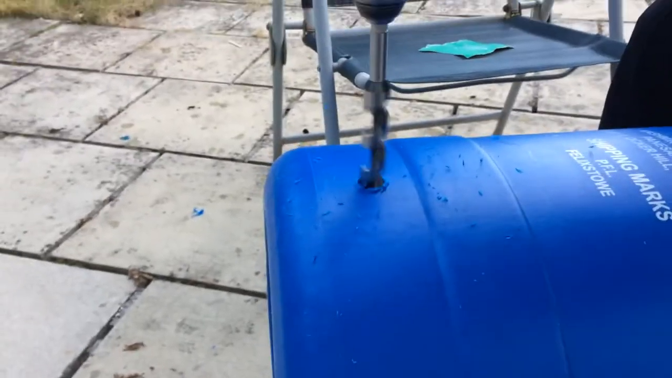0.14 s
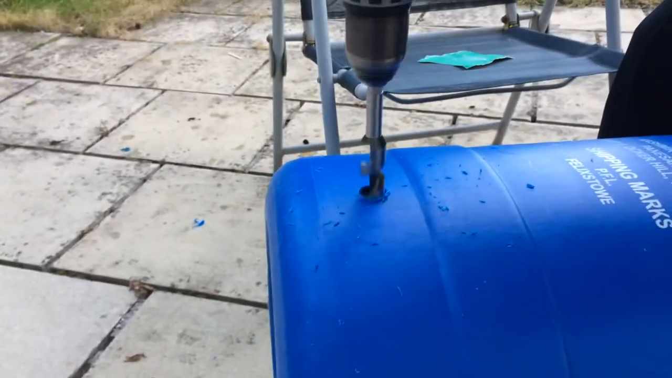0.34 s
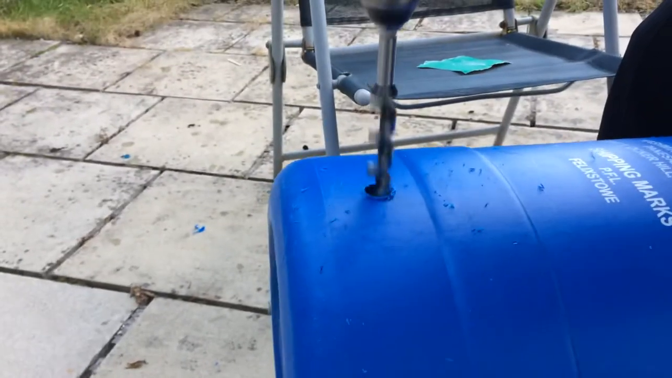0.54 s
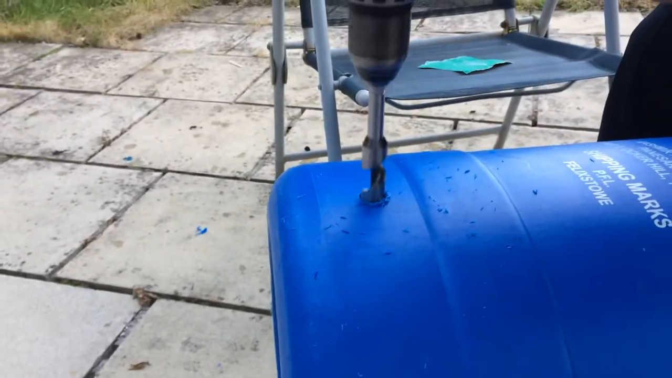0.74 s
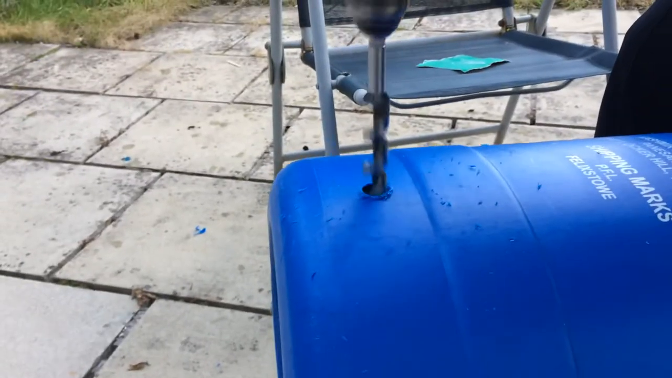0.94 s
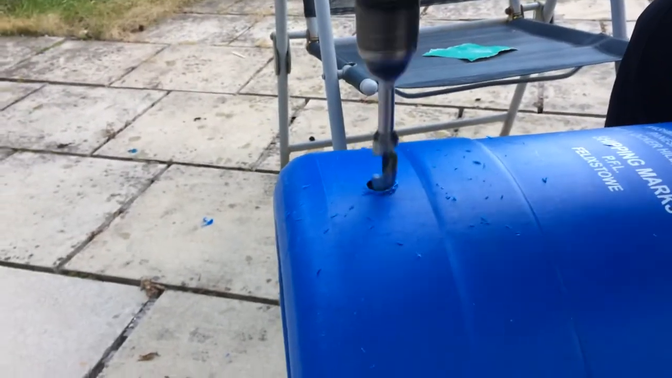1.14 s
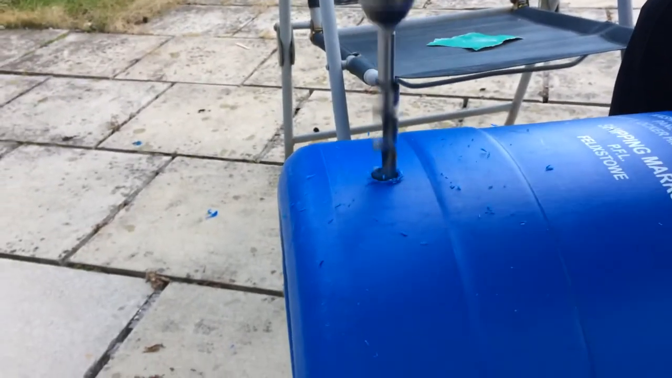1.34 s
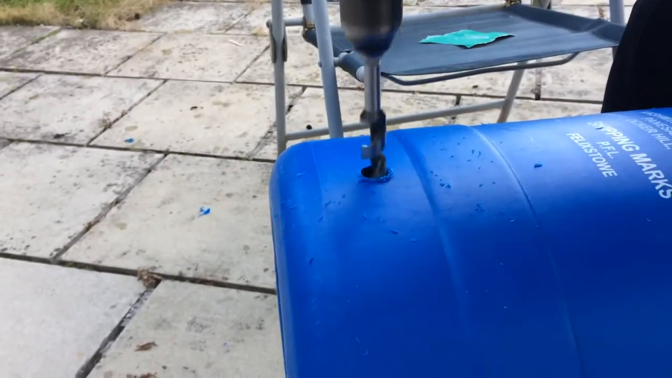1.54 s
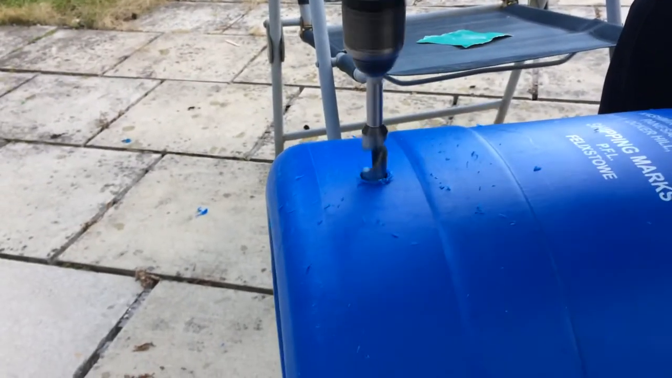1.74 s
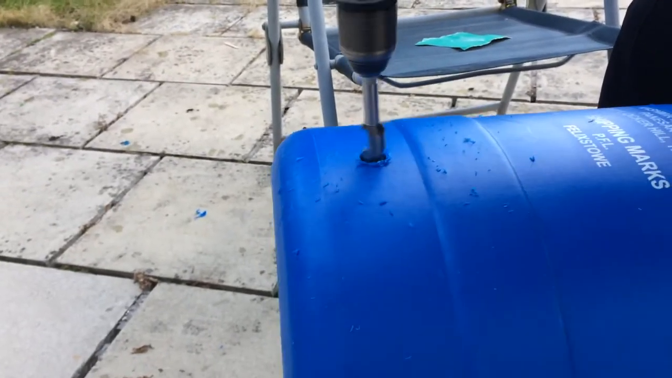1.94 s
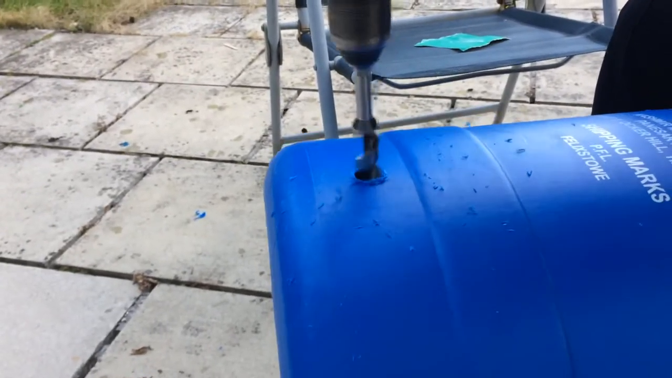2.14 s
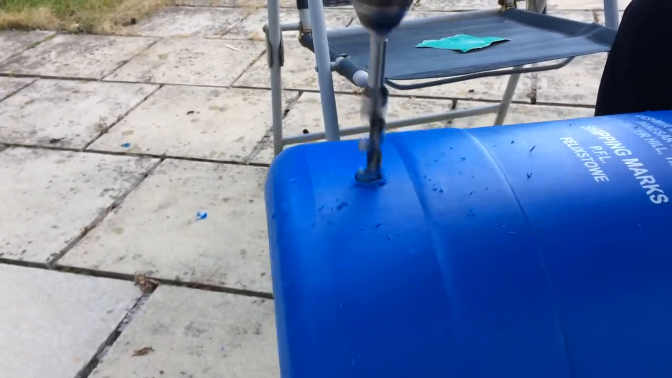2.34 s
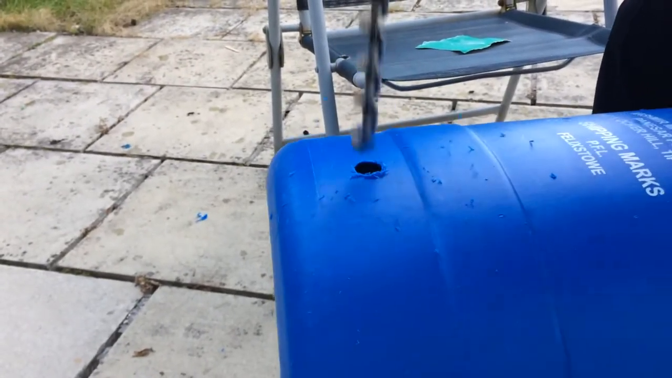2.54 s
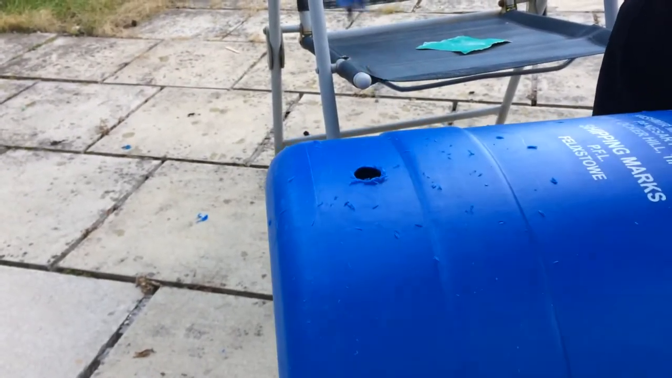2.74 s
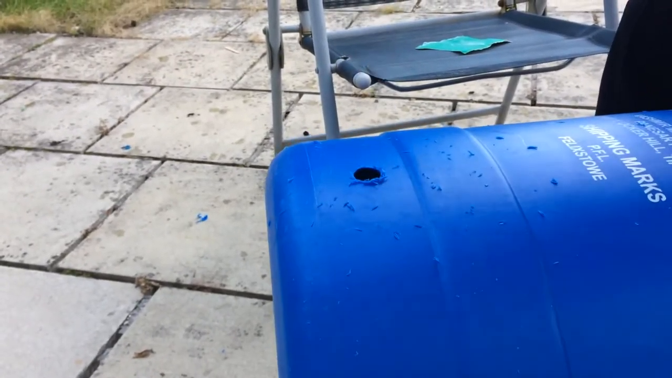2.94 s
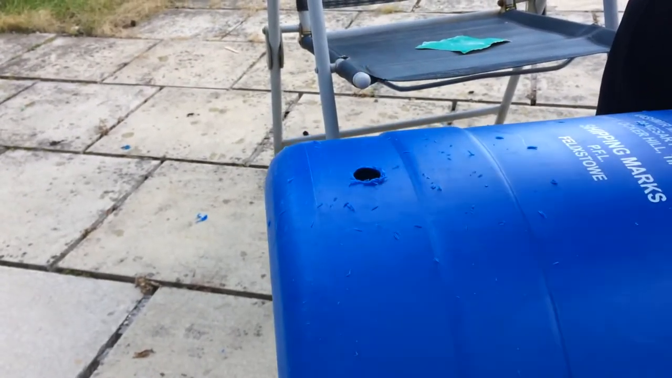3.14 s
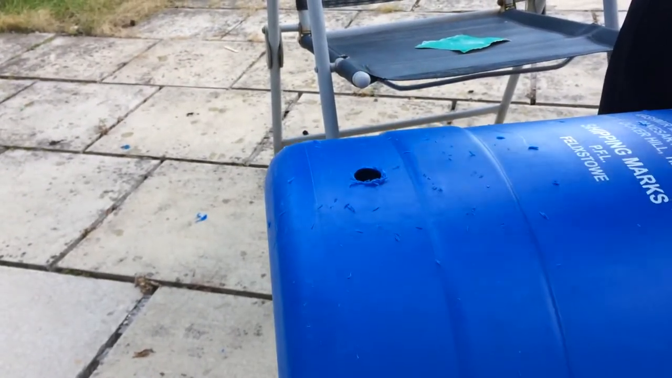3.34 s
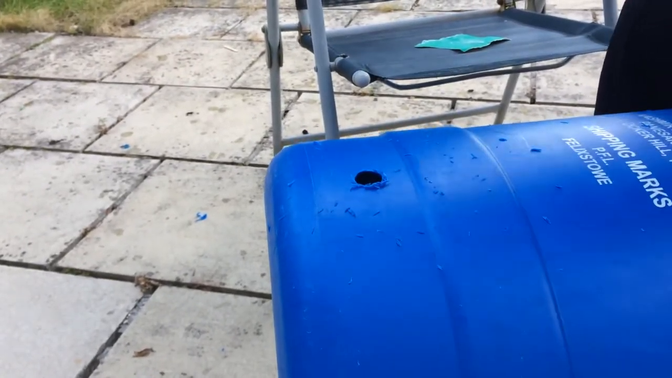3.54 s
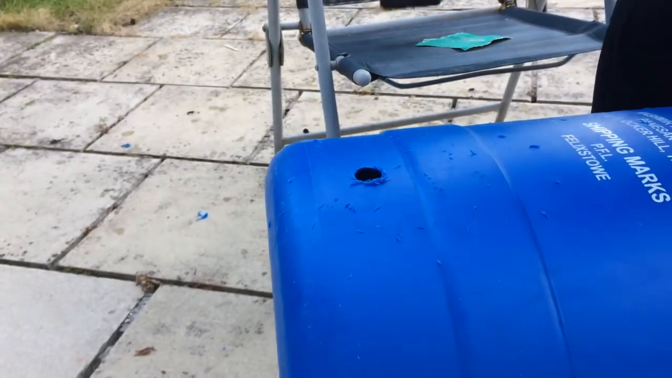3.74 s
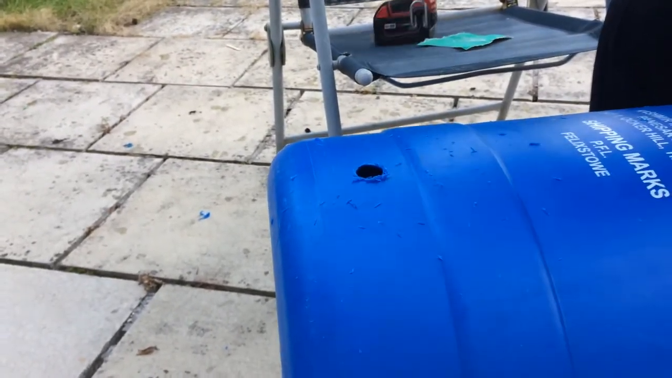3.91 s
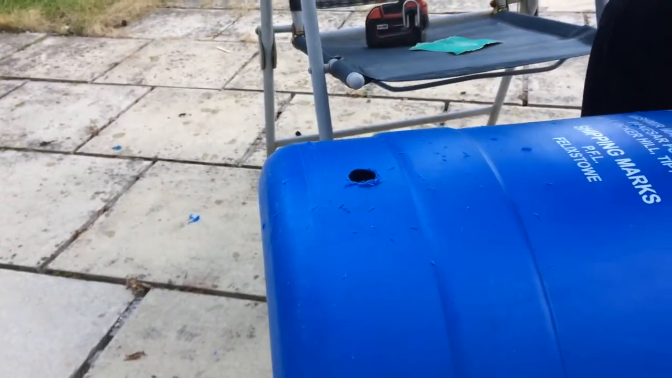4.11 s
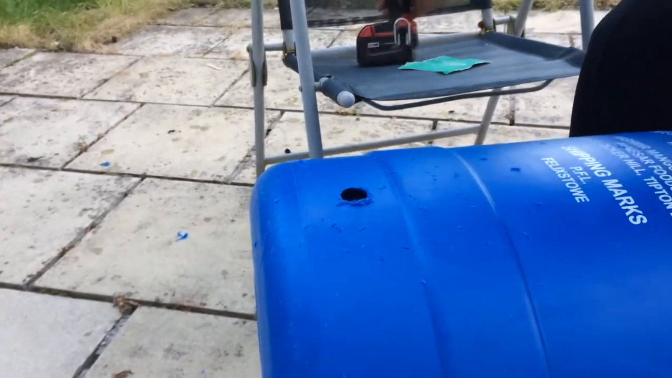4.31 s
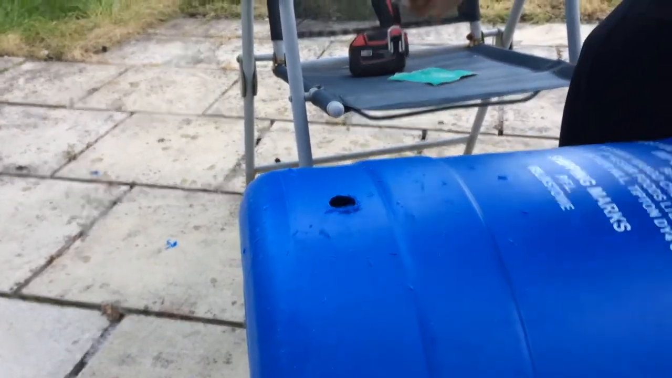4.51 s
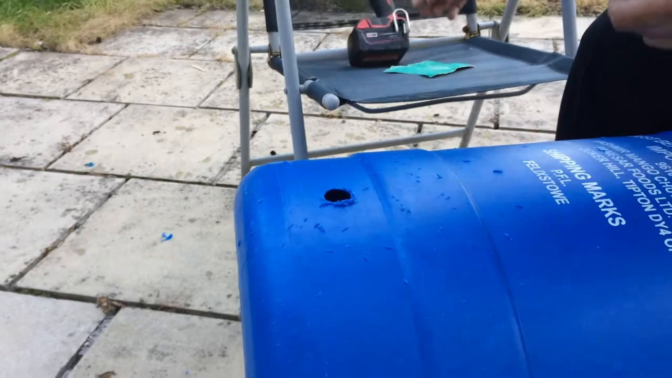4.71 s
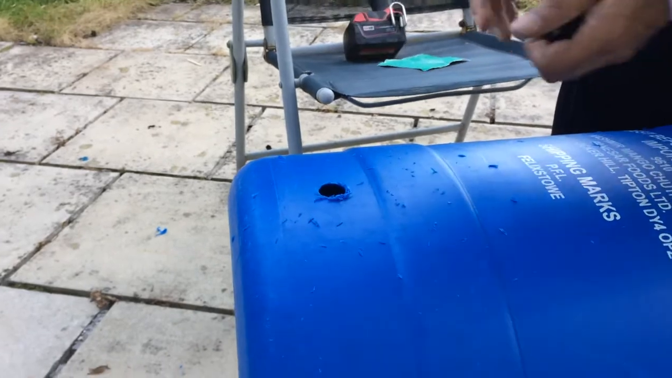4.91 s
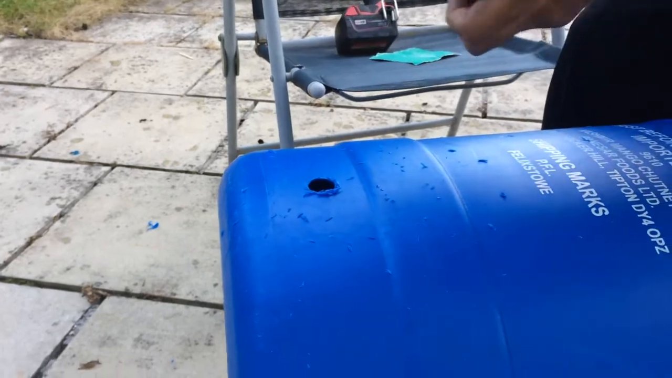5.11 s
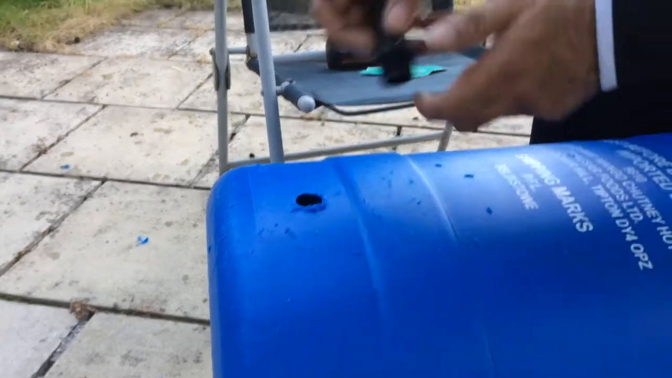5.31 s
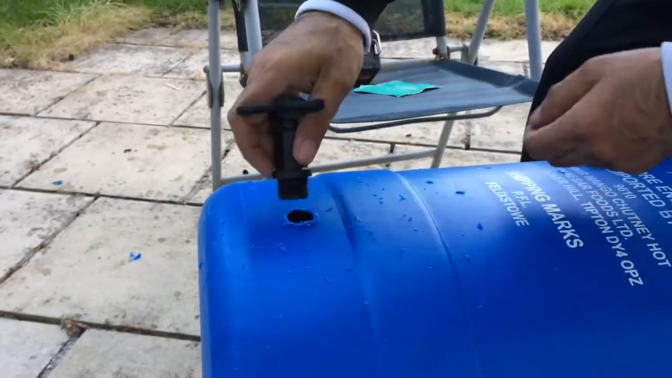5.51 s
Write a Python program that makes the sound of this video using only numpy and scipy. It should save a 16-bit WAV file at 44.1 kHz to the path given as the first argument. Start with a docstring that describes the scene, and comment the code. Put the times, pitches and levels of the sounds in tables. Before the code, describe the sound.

A loud high motor whine with gritty whirr wavers under load as a bit skips around a hole in an empty plastic drum, giving irregular hollow knocks, booms and chip snaps. The motor winds down fast. In the quiet patio air come light plastic ticks, a short seat creak, two bright rattling knocks of a metal chair frame with a slight outdoor echo, then soft fumbling. Dry, close, single microphone.

```python
"""A cordless drill reams a hole in an empty plastic barrel on a patio, close to a mono microphone.
The motor is sine lines locked to the armature over whirring noise. The bit is random skips and bites
ringing the plastic wall, while resonant noise booms in the barrel. The drill brakes and is laid on a
folding metal chair: the seat creaks and the frame clanks twice in dying sines and noise. Hands fumble
with a small fitting in ticks, rustle and faint fuzzy tones, over a quiet yard."""
import sys
import numpy as np
from scipy import signal
from scipy.fft import rfft, irfft, next_fast_len
from scipy.io import wavfile
from scipy.ndimage import uniform_filter1d

SR = 44100
rng = np.random.default_rng(int(sys.argv[2]) if len(sys.argv) > 2 else 0)


def digitize_waveform(pressure):
    """Quantize a signal to 16-bit integers and store it at the path in sys.argv[1].

    Rows of a 2-D input are taken as channels; values are limited to [-1, 1].
    """
    field = np.atleast_2d(pressure).T
    bounded = np.clip(field, -1, 1)
    quanta = np.round(bounded * 32767).astype(np.int16)
    wavfile.write(sys.argv[1], SR, quanta)


def voltage_ratio(level):
    """Linear amplitude factor for a level in decibels (scalar or array-like)."""
    return 10 ** (np.asarray(level, float) / 20)


N = 245352
T = np.arange(N) / SR  # s

# armature speed, sagging under load, then coasting and braking: time_s, turns_hz (before the sag of each bite)
MOTOR_SPEED = [(0, 234.4), (.15, 231.8), (.35, 236.8), (.6, 229.7), (.7, 236.6), (.75, 234.9), (.83, 237),
               (.9, 233.2), (1, 231.1), (1.1, 237.2), (1.15, 238), (1.4, 234.3), (1.62, 238.6), (1.75, 234),
               (1.8, 234.9), (2, 232.3), (2.05, 234.1), (2.2, 231.8), (2.25, 235.7), (2.35, 233.2),
               (2.4, 235.7), (2.46, 230.4), (2.5, 219.4), (2.54, 205.7), (2.58, 196.6), (2.66, 182),
               (2.678, 105), (2.705, 80)]
# strong motor lines: order (cycles per turn),
# family (0 steady rotor-slot lines, 1 first gear mesh, 2 second gear mesh, 3 doubled slot line)
LOUD_ORDERS = [(11, 0), (15, 1), (17.1, 2), (22, 3), (33, 0), (44, 0), (20.52, 2), (23.94, 2)]
# levels of those lines, row by row: level_db, gain_db per dB of cut, coasting_level_db
LOUD_LEVELS = [(-35, 0.11, -37), (-32, 0.11, -39), (-35, 0, -50), (-38.5, .2, -36), (-33.5, -.05, -43),
               (-54, 0, -41), (-43, -0.01, -42), (-42.5, .2, -39)]
# fainter motor lines: order (cycles per turn), row of the loud order whose level it follows
FAINT_ORDERS = [(13.3, 2), (13.68, 2), (14.05, 2), (17.67, 2), (18, 2), (27.36, 2), (20, 1), (30, 1),
                (31, 4), (34, 4), (36, 4), (42, 4)]
# level of each faint line against the loud one it follows: level_db
FAINT_LEVELS = [-27.5, -15.5, -18.5, -10.5, -10.5, -13.5, -23.5, -18, -11, -25, -10, -21]
# swell of the line families: time_s, family_1_db, family_2_db, family_3_db
MESH_SWELL = [(0, -1, 4, 6), (.25, -1, 0, 3), (.4, -4, -10, -2), (.6, 1.5, 0, 3), (.85, -2.5, -2.5, -2),
              (.97, -3, -3, -6), (1.06, 4, 5, 7), (1.2, -4, 2, -8), (1.3, -5.5, 2, 3), (1.45, 5.5, 8.5, 5),
              (1.62, 0, 2.5, -10), (1.8, -11, -5, -2), (1.95, -4, -10, 6), (2.1, -9.5, -13.5, -2),
              (2.18, -0.5, -10, -10), (2.33, 2, 4, 4.5), (2.5, 5, 1, 4)]
TRIGGER_OFF_S, COAST_S = 2.47, .08
BRAKE_S, BRAKE_DB_PER_S = 2.65, 55  # the fall is per order, so high orders go silent first
# brushes, gears and fan through the housing: pitch_hz, level_db (relative)
WHIRR_COLOUR = [(150, -16.5), (300, -5), (800, -13), (2000, -15), (2990, -13), (3300, -8), (4200, -8),
                (5300, -8.5), (6300, -12), (7700, -12.5), (8870, -14), (9560, -20.5), (10400, -20),
                (11200, -25), (12300, -19.5), (13800, -18.5), (15300, -31.5)]
# whirr over time: time_s, level_db, low_cut_db (taken from below 4 kHz)
WHIRR_LEVEL = [(0, -22, 1.5), (.76, -27.5, 5), (.96, -23.5, 1.5), (1.05, -28.5, 6.5), (1.39, -23.5, 1.5),
               (1.55, -26, 3.5), (1.76, -23.5, -3), (2.2, -25, -3), (2.25, -25.5, -3.5),
               (2.49, -25.5, -6.5), (2.65, -29.5, 3.5), (2.7, -43.5, -11), (2.78, -81.5, -8.5)]

# the bit swept round the hole: time_s, cut_db, air_boom_db
CUT = [(0, -33, -11.5), (.04, -17, -27), (.17, -9.5, -24.5), (.21, -16, -17.5), (.34, -32.5, -37),
       (.45, -18, -38.5), (.56, -12.5, -20), (.62, -19.5, -13.5), (.69, -30.5, -38), (.72, -20.5, -26),
       (.79, -36.5, -33), (.87, -17, -27), (1.01, -12, -15), (1.15, -44.5, -45), (1.23, -28, -31.5),
       (1.26, -35.5, -29.5), (1.29, -16.5, -23.5), (1.39, -14, -28), (1.46, -24, -22.5), (1.62, -43, -41),
       (1.66, -24, -41), (1.87, -20.5, -16.5), (1.96, -29.5, -19.5), (2.01, -22, -39.5),
       (2.06, -16.5, -22.5), (2.27, -28, -31), (2.33, -20, -20), (2.43, -27, -20), (2.48, -16, -28.5),
       (2.53, -11, -24), (2.63, -38, -12), (2.8, -62.5, -72)]
# flutes catching the wall: start_s, peak_db, pitch_hz, t60_s
BITES = [(.04, -4, 1010, 0.06), (.075, -1.5, 860, 0.042), (.111, -9, 410, 0.045), (.155, 0.5, 655, .09),
         (.2, -9.5, 406, .039), (.432, -11.5, 553, 0.069), (.542, -7.5, 756, 0.077), (.629, -6, 583, 0.084),
         (.709, -9, 560, .025), (.873, -4, 604, 0.072), (.911, -6.5, 993, 0.042), (.946, -3.5, 1180, 0.097),
         (1.081, -16.5, 650, .036), (1.23, -14, 1040, 0.027), (1.289, -8, 580, 0.045),
         (1.354, -7, 1000, 0.03), (1.38, -10.5, 392, .03), (1.464, -11, 970, 0.034),
         (1.591, -17.5, 600, 0.035), (1.663, -12, 1060, 0.048), (1.709, -11.5, 990, .052),
         (1.771, -4, 880, 0.052), (1.819, -5, 1080, .047), (1.851, -11.5, 397, 0.036),
         (1.988, -14, 910, .03), (2.046, -10, 690, .03), (2.132, -15.5, 593, .049),
         (2.279, -10.5, 1000, 0.13), (2.322, -15, 654, .037), (2.411, -10, 1160, 0.13),
         (2.481, -10.5, 1170, .03), (2.519, -10, 730, 0.039)]
# chips breaking off: start_s, peak_db, pitch_hz
SNAPS = [(0.1118, -3.5, 3550), (0.2687, -2, 3500), (0.3617, -9.5, 2670), (.4284, -13.5, 2476),
         (0.5573, -13, 3420), (0.593, -12, 3420), (0.8895, -10, 2467), (.9123, -10.5, 3945),
         (.9448, -14, 2560), (1.0051, -16, 3480), (1.274, -18, 4080), (1.315, -6.5, 2614),
         (1.3838, -16, 3950), (1.4594, -11, 3480), (1.6541, -18, 2620), (1.769, -6, 3980),
         (1.8173, -12, 2570), (1.8906, -7, 2697), (1.9096, -17, 5100), (2.0522, -12, 2580),
         (2.0732, -16, 5160), (2.0936, -11, 5130), (2.143, -10, 3460), (2.1934, -5, 2610),
         (2.2583, -3, 3572), (2.2825, -6, 3940), (2.4154, -12.5, 3450), (2.4593, -10.5, 3530),
         (2.4823, -14, 3370), (2.6883, -20, 3520)]
# barrel wall resonances: pitch_hz, width_hz, level_db (relative)
WALL = [(298, 91, 4.5), (406.4, 56, 4.5), (571, 180, 9.5), (703, 110, 6.5), (870, 130, 6.5),
        (975, 130, 1.5), (1180, 140, -1), (1320, 120, -39), (1600, 260, -13), (2310, 390, -11.5)]
# boom resonances, in order thud, air, shell: pitch_hz, width_hz
BOOMS = [(63, 30), (110, 6.9), (188, 55)]
# low thud at a cut of -20.5 dB: time_s, level_db
THUD = [(0, -32), (1.2, -29), (1.6, -30), (1.8, -21.5), (2.4, -28), (2.6, -19.5), (2.8, -19.5)]
THUD_SHARE = 0.54  # dB gained per dB of cut
SHELL_DB, SHELL_SHARE = -28, .5  # shell boom at a cut of -20 dB, and dB gained per dB of cut
# the bit slams into the rim and the shell booms: top_s, level_db
JOLTS = [(.04, -20), (.48, -11), (.61, -17.5), (.72, -23.5), (0.911, -10), (1.291, -14), (1.43, -21),
         (1.6, -21), (1.68, -20.5), (1.959, -19.5), (2.04, -17.5), (2.449, -18)]
JOLT_RISE_DB, JOLT_FALL_DB = 500.5, 280  # dB per s
# barrel left ringing as the bit comes out: pitch_hz, level_db, t60_s
BARREL_RING = [(64.7, -25.5, 1.42), (114, -36, 0.95), (272, -45, 0.53), (732, -51, 0.88),
               (965, -47.5, 0.78)]
RING_S = 2.66
# a touch damps the ringing barrel: start_s, damping in dB per s
TOUCH = (3.05, 56)

# distant traffic and air: pitch_hz, level_db (relative)
YARD_COLOUR = [(15, -38.5), (25, -8), (107, 1), (129, -9.5), (198, -6), (366, -12), (442, -15),
               (1040, -11.5), (2530, -26.5), (4220, -33), (5520, -35), (15300, -41)]
YARD_DB = -56

# sleeves and fingers brush past: top_s, level_db, rise in dB per s, fall in dB per s
RUSTLE = [(2.75, -57.5, 900, 180), (3.12, -58.5, 150, 61), (3.3, -66, 28, 330), (3.558, -65, 902, 900),
          (3.856, -61.5, 76, 260), (4.2, -60, 900, 27), (4.866, -59, 90, 100), (4.968, -61.5, 700, 30),
          (5.146, -53.5, 290, 400), (5.332, -56.5, 198, 161)]
# spectrum of the rustle: pitch_hz, level_db (relative)
RUSTLE_COLOUR = [(880, -38), (1500, 3.5), (1880, 0.5), (5410, -7.5), (6140, -6), (11300, -19), (14000, -14),
                 (15300, -23)]
# small ticks of plastic and fingers: start_s, peak_db, pitch_hz, t60_s
TICKS = [(2.797, -42, 3730, .02), (3.04, -49.5, 2560, .02), (3.0913, -45, 6000, .02),
         (3.137, -29.5, 3770, 0.016), (3.1737, -38.5, 5470, 0.021), (3.255, -41.5, 3280, .02),
         (3.2795, -43.5, 3720, 0.018), (3.3094, -50, 3220, .02), (3.325, -46.5, 3350, .02),
         (3.4481, -53, 4100, .02), (3.5568, -44, 4330, .02), (3.6931, -47, 7180, 0.018),
         (3.861, -52.5, 7000, .02), (4.2885, -48.5, 3210, .02), (4.756, -42, 1823, .02),
         (4.836, -44, 1840, 0.019), (5.1589, -47.5, 2840, 0.018), (5.325, -41.5, 6170, .02)]
# soft knocks: start_s, peak_db, pitch_hz
THUMPS = [(4.844, -38, 230), (4.861, -37, 145)]
# faint fuzzy tone while the fitting is handled: time_s, pitch_hz, level_db
SQUEAK = [(4.95, 1400, -67.5), (4.958, 1430, -66), (5.138, 1320, -61), (5.172, 1320, -67),
          (5.262, 1320, -58.5), (5.398, 1336, -69), (5.416, 1354, -57.5), (5.52, 1333, -77.5)]
SQUEAK_WIDTH_HZ = 91
# two more faint fuzzy tones, each: time_s, pitch_hz, level_db
DRONES = [
    [(4.28, 760, -72), (4.42, 760, -62), (4.55, 750, -72)],
    [(4.95, 2900, -72), (5.1, 2750, -69), (5.35, 2700, -72)],
]

# seat fabric creaking under load: time_s, pitch_hz, level_db
CREAK = [(3.64, 873, -78), (3.648, 879, -78), (3.744, 880, -59), (3.818, 884, -53.5), (3.894, 870, -64),
         (3.96, 886.0, -57), (4.07, 880, -58)]
PARTNER_RATIO, PARTNER_DB = .82, -8  # a lower partner tone against the main creak
# knocks of the frame: start_s, ring_peak_db, clatter_peak_db (both before the bass is thinned)
CLANKS = [(3.97, -7, -3), (3.973, -18.5, -24.5), (3.98, -10, -12), (3.991, -12, -13.5), (4.081, -11.5, -15),
          (4.084, -19.5, -22), (4.103, -26, -29)]
# chair frame modes: pitch_hz, level_db (relative), t60_s
FRAME = [(960, -28, 0.041), (1200, -12, .04), (1580, -12.5, 0.42), (1620, -10, 0.26), (1655, -14, .38),
         (1720, -16, .08), (1830, 1, 0.071), (2038, -10.5, 0.15), (2480, -20, .12), (2632, -22, .15),
         (4340, -23, .15), (2710, -3, 0.024), (3220, -0.5, 0.022), (3363, -27.5, 0.39), (4985, -26, 0.31),
         (5290, -4, .03), (6640, -10.5, .03)]
# loose joints: pitch_hz, level_db (relative)
CLATTER_COLOUR = [(150, -28.5), (600, -22), (1000, 2), (1800, 2), (3300, -6), (6500, -8.5), (9000, -14.5),
                  (15000, -25.5)]
CLATTER_T60_S = 0.047
SEAT_HZ, SEAT_DB = 260, -25.5  # soft seat thump under each knock, level against the ring


def evened(x):
    """Scales to rms 1."""
    return x / np.sqrt(np.mean(x ** 2) + 1e-20)


def columns(rows):
    """Every column of a table, sample by sample, and a gate that is shut outside it."""
    s, *values = np.transpose(rows)
    gate = (T >= s[0]) & (T <= s[-1])
    return [np.interp(T, s, v) for v in values] + [gate]


def coloured(x, points):
    """Shapes x by a spectrum drawn on a log frequency scale, then scales it to rms 1."""
    hz, db = np.transpose(points)
    size = next_fast_len(len(x))
    f = np.fft.rfftfreq(size, 1 / SR)
    gain = voltage_ratio(np.interp(np.log(f + 1), np.log(hz + 1), db))
    return evened(irfft(rfft(x, size) * gain, size)[:len(x)])


def highpass(x, order, hz):
    """Rolls off the bass."""
    return signal.sosfilt(signal.butter(order, hz, "high", fs=SR, output="sos"), x)


def lowpass(x, order, hz):
    """Rolls off the treble."""
    return signal.sosfilt(signal.butter(order, hz, fs=SR, output="sos"), x)


def resonate(x, hz, width_hz):
    """A resonance of gain 1 on a fixed or moving frequency: shift to 0 Hz, smooth, shift back."""
    turn = np.exp(2j * np.pi * np.cumsum(hz * np.ones(len(x))) / SR)
    r = np.exp(-np.pi * width_hz / SR)
    return 2 * (turn * signal.lfilter([1 - r], [1, -r], x / turn)).real


def wander(rate_hz):
    """Slow random drift of rms 1."""
    return evened(lowpass(rng.standard_normal(N), 2, rate_hz))


def swells(rows):
    """Gain of swells that climb to a top and sink again, straight in dB."""
    return sum(voltage_ratio(db - np.where(T < s, rise * (s - T), fall * (T - s))) for s, db, rise, fall in rows)


def add(mix, s, db, sound):
    """Places a sound with its peak at db."""
    part = mix[round(s * SR):][:len(sound)]
    part += (voltage_ratio(db) * sound / abs(sound).max())[:len(part)]


def burst(hz, t60, sharp, rise):
    """A dying puff of noise through one resonance."""
    t = np.arange(round(1.2 * t60 * SR) + 64) / SR
    puff = rng.standard_normal(SR // 5)[:len(t)] * voltage_ratio(-60 * t / t60) * (1 - np.exp(-t / rise))
    return resonate(puff, hz, hz / sharp)


def sag(share, recovery_s):
    """Each bite loads the motor: the speed drops and climbs back, about a 50 ms moving mean."""
    load = np.zeros(N)
    load[np.round(np.array(BITES)[:, 0] * SR).astype(int)] = share
    load = uniform_filter1d(load, 200) * 1.
    load = signal.lfilter([1], [1, -np.exp(-1 / (recovery_s * SR))], load)
    return uniform_filter1d(load, SR // 20) - load


def motor():
    """Sine lines at multiples of the armature speed over a whirr that flutters with each turn."""
    hz, on = columns(MOTOR_SPEED)
    swell_db = [0] + columns(MESH_SWELL)
    load_db = uniform_filter1d(np.maximum(columns(CUT)[0], -45), SR // 12) + 24
    coasting = np.clip((T - TRIGGER_OFF_S) / COAST_S, 0, 1)
    braked_db = BRAKE_DB_PER_S * np.maximum(T - BRAKE_S, 0)
    lines_db = []
    for (order, family), (db, share, coast_db) in zip(LOUD_ORDERS, LOUD_LEVELS):
        driven_db = db + swell_db[family] + share * load_db
        line_db = driven_db * (1 - coasting) + coast_db * coasting
        lines_db.append(line_db - order * braked_db + 1.3 * wander(6.5))

    speed = hz * (1 + sag(share=0.0098, recovery_s=0.039) + 0.00045 * wander(60))
    turns = np.cumsum(speed) / SR
    lines = [(order, row, 0) for row, (order, _) in enumerate(LOUD_ORDERS)]
    lines += [(order, row, db) for (order, row), db in zip(FAINT_ORDERS, FAINT_LEVELS)]
    whine = np.zeros(N)
    for order, row, db in lines:
        gain = voltage_ratio(lines_db[row] + db + wander(60))
        whine += gain * np.sqrt(2) * np.sin(2 * np.pi * order * turns)

    whirr_db, low_cut_db, blowing = columns(WHIRR_LEVEL)
    flutter = voltage_ratio(2.0 * np.cos(2 * np.pi * turns) + 1.5 * wander(130))
    whirr = coloured(rng.standard_normal(N) * flutter, WHIRR_COLOUR)
    tilt = (voltage_ratio(-low_cut_db) - 1) * lowpass(whirr, 1, 4000)
    return whine * on + voltage_ratio(whirr_db) * (whirr + tilt) * blowing


def bite(hz, t60, skips_per_s, sharp):
    """A flute catches, then skips a few times; each catch rings one patch of wall."""
    t = T[:round(1.3 * t60 * SR) + 400]
    hit, size = rng.random((2, SR // 5))[:, :len(t)]
    catches = (hit < skips_per_s / SR) * (2 * size - 1) * voltage_ratio(-40 * t / t60)
    catches[0] = .6
    return resonate(resonate(catches, hz, hz / sharp), hz, 3.0 * hz)


def flute_chatter():
    """Random clicks of either sign, as the flutes skip round the rim in clumps."""
    clicks = rng.random(N) < 900 / SR  # 900 a second on average
    strength = voltage_ratio(2.6 * np.minimum(rng.exponential(1, N), 4))
    return clicks * strength * rng.choice([-1, 1], N) * voltage_ratio(4.5 * wander(35))


def barrel_booms(scrape_db, air_db, pressed):
    """Noise through low resonances: a thud, the air inside and the shell."""
    thud_db = columns(THUD)[0] + THUD_SHARE * (scrape_db + 20.5)
    jolts = swells((s, db, JOLT_RISE_DB, JOLT_FALL_DB) for s, db in JOLTS)
    shell = voltage_ratio(SHELL_DB + SHELL_SHARE * (scrape_db + 20)) + jolts
    thud_db = thud_db - 25 * (1 - pressed)
    out = np.zeros(N)
    for db, (hz, width) in zip([thud_db, air_db, 20 * np.log10(shell)], BOOMS):
        boom = resonate(resonate(rng.standard_normal(N), hz, width), hz, 2 * width)
        loudness = np.sqrt(np.maximum(uniform_filter1d(boom ** 2, 1500), 1e-12))
        boom /= loudness ** 0.53  # steadily driven, so it seldom drops out
        out += voltage_ratio(db) * evened(boom)
    return out, thud_db


def barrel_ring():
    """The barrel's own modes die away as sines once the bit is out, faster after a touch."""
    t = np.maximum(T - RING_S, 0)
    touch_s, touch_db_per_s = TOUCH
    damped_db = touch_db_per_s * np.maximum(T - touch_s, 0)
    ring = sum(voltage_ratio(db - damped_db - 60 * t / t60) * np.sin(2 * np.pi * hz * t) for hz, db, t60 in BARREL_RING)
    return ring * (1 - np.exp(-t / 0.024))


def barrel():
    """The flutes chatter on the rim; wall, shell and the air inside answer."""
    scrape_db, air_db, on = columns(CUT)
    chatter = flute_chatter()
    wall = np.zeros(N)
    for hz, width, db in WALL:
        wall += voltage_ratio(db) * evened(resonate(resonate(chatter, hz, width), hz, hz))
    hard_skips = chatter * np.sqrt(abs(chatter))  # the hardest skips spit chips
    crackle = resonate(resonate(hard_skips, 4200, 3500), 4200, 6000)
    scrape = voltage_ratio(scrape_db) * (evened(wall) + voltage_ratio(-14.5) * evened(crackle))

    pressed = np.clip((RING_S + 0.092 - T) / 0.05, 0, 1)  # falls to 0 as the bit lifts off the rim
    booms, thud_db = barrel_booms(scrape_db, air_db, pressed)
    # a narrow resonance of the air hums slowly along with the thud
    cavity = resonate(rng.standard_normal(N) * voltage_ratio(thud_db) * on, BARREL_RING[0][0], 5.2)
    out = (scrape + booms) * on + voltage_ratio(-34.5) * evened(cavity) * pressed

    for s, db, hz, t60 in BITES:
        add(out, s, db, bite(hz, t60, skips_per_s=540, sharp=5.4))
    for s, db, hz in SNAPS:
        add(out, s, db, resonate(burst(hz, 0.012, sharp=1.0, rise=0.00017), hz, 3700))
    return out + barrel_ring()


def yard():
    """Distant traffic and air as coloured noise, swelling a little."""
    return voltage_ratio(YARD_DB + 1.2 * wander(3.2)) * coloured(rng.standard_normal(N), YARD_COLOUR)


def fuzzy_tone(rows, width_hz):
    """Noise through a narrow moving resonance."""
    hz, db, on = columns(rows)
    tone = resonate(resonate(rng.standard_normal(N), hz, width_hz), hz, width_hz)
    return voltage_ratio(db) * evened(tone) * uniform_filter1d(on * 1., 800)


def hands():
    """Grainy noise for rustle, short resonant puffs for ticks and knocks, and faint fuzzy tones."""
    grains = rng.standard_normal(N) * voltage_ratio(2.6 * wander(300))
    out = swells(RUSTLE) * coloured(grains, RUSTLE_COLOUR)
    out += fuzzy_tone(SQUEAK, SQUEAK_WIDTH_HZ)
    out += sum(fuzzy_tone(rows, 150) for rows in DRONES)
    for s, db, hz, t60 in TICKS:
        add(out, s, db, resonate(burst(hz, t60, sharp=2.1, rise=0.00037), hz, 5000))
    for s, db, hz in THUMPS:
        add(out, s, db, burst(hz, .04, sharp=0.97, rise=.002))
    return out


def seat_creak():
    """Two unsteady sines: the seat fabric creaks under load."""
    hz, db, on = columns(CREAK)
    phase = 2 * np.pi * np.cumsum(hz * (1 + 0.0046 * wander(40))) / SR
    creak = np.sin(phase) + voltage_ratio(PARTNER_DB) * np.sin(PARTNER_RATIO * phase)
    return creak * np.sqrt(2) * voltage_ratio(db + 1.9 * wander(30)) * uniform_filter1d(on * 1., 800)


def patio_echo(x):
    """Short echoes off paving and walls as a noise tail, treble dying first."""
    t = T[:SR // 2]
    tail = rng.standard_normal(len(t)) * (t > .006)
    low = lowpass(tail, 2, 3000)
    tail = low * voltage_ratio(-60 * t / 0.43) + (tail - low) * voltage_ratio(-60 * t / 0.32)
    return signal.fftconvolve(x, tail / np.linalg.norm(tail))[:N]


def chair():
    """The frame takes the drill's weight: a creak, then rattling knocks through the tubes."""
    rings, clatter, seat = np.zeros((3, N))
    t = T[:SR // 2]
    for s, db, clatter_db in CLANKS:
        strength = voltage_ratio(2 * rng.standard_normal(len(FRAME)))  # each knock excites the modes differently
        ring = np.zeros(len(t))
        for g, (hz, mode_db, t60) in zip(strength, FRAME):
            ring += g * voltage_ratio(mode_db - 60 * t / t60) * np.sin(2 * np.pi * hz * t)
        rattle = coloured(rng.standard_normal(len(t)), CLATTER_COLOUR) * voltage_ratio(-60 * t / CLATTER_T60_S)
        add(rings, s, db, ring)
        add(seat, s, db + SEAT_DB, burst(SEAT_HZ, 0.089, sharp=1.0, rise=0.0037))
        add(clatter, s, clatter_db, rattle)
    echo = patio_echo(clatter + voltage_ratio(-2.0) * rings)
    knocks = rings + clatter + voltage_ratio(-12.5) * echo
    return seat_creak() + seat + highpass(knocks, 2, 750)  # thin tubes radiate little bass


def scene():
    """Everything reaches one microphone, heard alike on both channels."""
    mono = motor() + barrel() + yard() + hands() + chair()
    return np.array([mono, mono])


def roll_off(x):
    """The treble ends steeply here."""
    return signal.sosfilt(signal.butter(12, 15460, fs=SR, output="sos"), x)


def record(dry):
    """Microphone bass roll-off, then soft overload near full scale."""
    heard = highpass(dry, 3, 36)
    overloaded = np.tanh(heard / 1.396) * 1.34
    mix = np.clip(overloaded, -1, 1)
    return roll_off(mix)


dry = scene()
out = record(dry)
digitize_waveform(out)
```